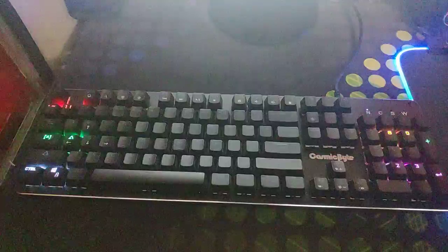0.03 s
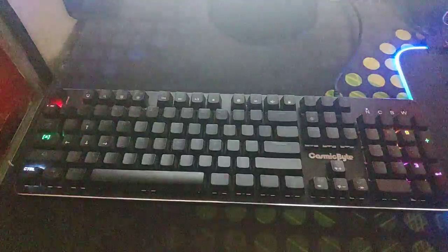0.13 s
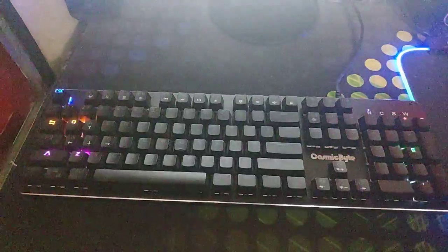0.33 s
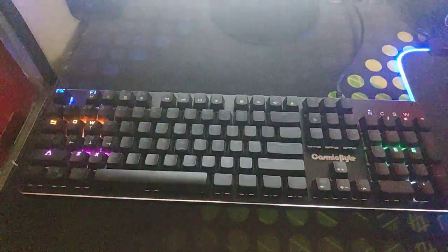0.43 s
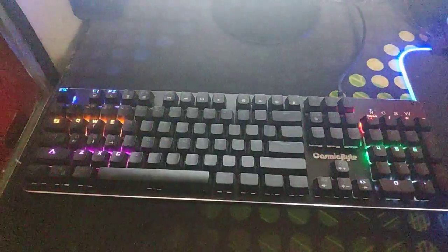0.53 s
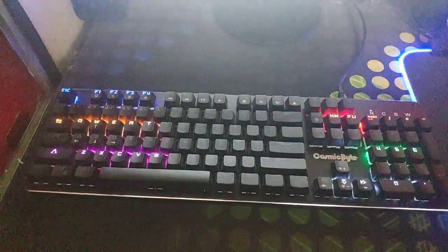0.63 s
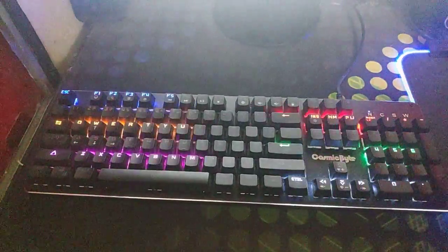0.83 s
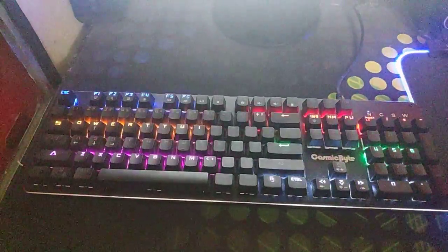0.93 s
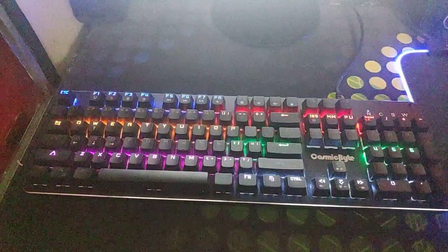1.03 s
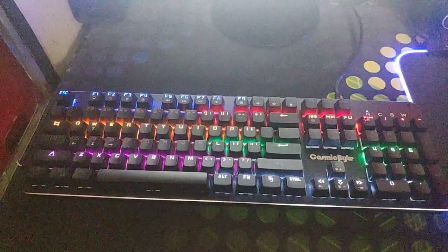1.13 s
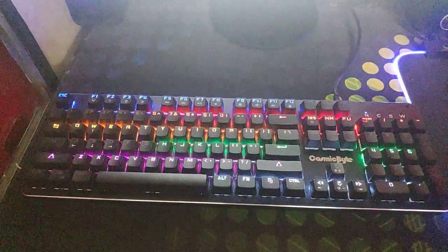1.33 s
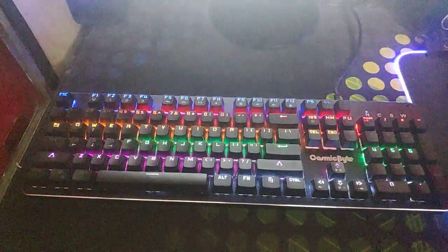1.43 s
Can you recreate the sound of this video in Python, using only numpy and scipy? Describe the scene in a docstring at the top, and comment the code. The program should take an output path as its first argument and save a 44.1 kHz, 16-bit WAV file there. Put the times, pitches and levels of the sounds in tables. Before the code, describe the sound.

A fan runs in a quiet room, fading in by 0.3 seconds: a low hum throbbing about three times a second over airy rumble and hiss. A few faint clicks fall between 0.1 and 0.3 seconds, mostly left. A thin, fast, high chirr sounds close on the right until about 0.6 seconds. One soft low bump comes at about 1.25 seconds as the fan continues.

```python
"""A quiet room with a fan running, heard from a phone held over a desk. The turning fan makes a
throbbing hum near 200 Hz, and its moving air rumbles and hisses. The microphones fade in and settle
with a few faint clicks. A thin, fast chirr, perhaps the lens focusing, sounds close to the right
microphone for about the first half second. One soft low bump comes near the end."""
import sys
import numpy as np
from scipy import signal
from scipy.fft import rfft, irfft
from scipy.io import wavfile
from scipy.ndimage import uniform_filter1d

SR = 44100
rng = np.random.default_rng(int(sys.argv[2]) if len(sys.argv) > 2 else 0)


def waveform_to_disk(signal):
    """Save audio, clipped to [-1, 1], as 16-bit WAV at the path in sys.argv[1]."""
    frames = np.transpose(np.atleast_2d(signal))
    scaled = np.clip(frames, -1, 1) * 32767
    samples = np.round(scaled).astype(np.int16)
    wavfile.write(sys.argv[1], SR, samples)


N = 66150
HUM_HZ = 197.9  # the fan's main tone


def fan_hum(t):
    """Tones that follow the fan's speed; the main one throbs about three times a second."""
    # weaker fan tones: f/Hz, level/dB, left minus right/dB
    weak_tones = [(171, -68, 1.5), (251.6, -64, -1), (277.7, -65.5, -0.5), (334.6, -72, -7.5),
                  (394, -76.5, 8), (498, -75, 7.5), (590.5, -72.5, 6.5), (706, -78, -8), (854, -77, 2.5),
                  (1588, -80, -1)]
    fan_time = t + .002 * np.cumsum(drift(5.85)) / SR  # the speed wanders a little
    peak_s, period_s = .31, .322
    throb = .2 + .8 * np.cos(np.pi * (t - peak_s) / period_s) ** 2
    main = throb * fan_tone(fan_time, HUM_HZ, db=-51.5, pan_db=-1)
    return main + sum(fan_tone(fan_time, *row) for row in weak_tones)


def fan_tone(fan_time, hz, db, pan_db):
    """One fan tone that wavers in pitch and level, placed between the microphones."""
    wander_hz = .7 * hz / HUM_HZ * drift(20)
    cycles = hz * fan_time + np.cumsum(wander_hz) / SR + rng.random()
    wave = np.sqrt(2) * np.cos(2 * np.pi * cycles) * gain(db + 1.46 * drift(18.33))
    return wave * gain([[pan_db / 2], [-pan_db / 2]])


def fan_air():
    """Moving air: both microphones hear much the same rumble, but each its own hiss."""
    # air noise: f/Hz, left level/dB, right level/dB (in a band 1 Hz wide)
    air = np.array([(25.4, -76, -88), (49.5, -78.5, -70.5), (61, -83, -85.5), (95.6, -78, -77.5),
                    (138, -82.5, -82.5), (178, -78.5, -78.5), (262, -78.5, -73), (312, -83, -87.5),
                    (376, -85, -80.5), (402, -86.5, -89), (555, -88, -92.5), (760, -90, -88.5),
                    (967, -89.5, -90), (1160, -94, -95.5), (1820, -96, -97.5), (2330, -100, -101),
                    (3450, -104, -104), (4740, -109, -106), (6500, -114, -107), (8500, -115, -109),
                    (10660, -116, -116), (14100, -115, -115)])
    # how alike the microphones sound: f/Hz, correlation (1 means the same)
    likeness = np.array([(30, 0.79), (70, 0.78), (130, 0.91), (200, 1), (300, 0.02), (630, 0.46),
                         (1300, -0.3), (3000, 0.0078)])
    log_f = np.log(np.maximum(np.fft.rfftfreq(N, 1 / SR), 1))
    alike = np.clip(np.interp(log_f, np.log(likeness[:, 0]), likeness[:, 1]), -.99, .99)
    shared = noise(np.sqrt((1 + alike) / 2))
    opposite = noise(np.sqrt((1 - alike) / 2))
    colours = [gain(np.interp(log_f, np.log(air[:, 0]), db)) for db in air[:, 1:].T]
    both = irfft(rfft([shared + opposite, shared - opposite]) * colours, N)
    flicker_db = .64 * drift(30)
    return both * np.sqrt(SR / 2) * gain(flicker_db)


def chirr(t):
    """Even, short pulses of a rough high ring, ending in one longer burst."""
    # strength of the pulses: t/s, level/dB
    strength = [(.08, -71), (0.114, -61.5), (0.133, -70), (.24, -62.5), (.345, -58.5), (.39, -58),
                (.425, -66), (.50, -58.5), (.60, -59.5), (.64, -70)]
    times, db = np.array(strength).T
    ring_hz, rough_share = 7010, .47
    pulses_per_s, one_pulse_at_s = 64.2, .454
    from_pulse_s = (((t - one_pulse_at_s) * pulses_per_s + .5) % 1 - .5) / pulses_per_s
    pulses = swell(from_pulse_s, width_s=.0023) * np.interp(t, times, gain(db), left=0, right=0)
    last_burst = gain(-58) * swell(t - .623, width_s=.0087)
    ring = np.sqrt(2) * np.sin(2 * np.pi * ring_hz * t + drift(150))
    rough = noise_band(ring_hz, width_hz=680)
    rough_ring = np.sqrt(1 - rough_share) * ring + np.sqrt(rough_share) * rough
    return np.maximum(pulses, last_burst) * rough_ring


def microphone_settling(t):
    """Each microphone's resting level (its offset) swings once, too slowly to hear."""
    # the swing, left then right: starting slope/(1/s), time to cross zero/s, decay time/s
    swings = [(2.28, 0.25, 0.13), (0.5, 0.36, 0.19)]
    age = np.maximum(t - .117, 0)
    return np.array([slope * age * (1 - age / cross) * np.exp(-age / decay)
                     for slope, cross, decay in swings])


def microphone_clicks(t):
    """Sudden steps in the microphones' offset click, mostly on the left."""
    # offset steps: t/s, size/dB
    steps = [(.1205, -54), (.1595, -36), (.2195, -34.5), (.2795, -37.5)]
    rise_s, decay_s, right_db = .000016, .018, -9
    clicks = np.zeros(N)
    for start, db in steps:
        age = np.maximum(t - start, 0)
        clicks -= gain(db) * (np.exp(-age / decay_s) - np.exp(-age / rise_s))
    return clicks * gain([[0], [right_db]])


def bump(t, at_s=1.248, hz=100):
    """A soft low bump, a few cycles long."""
    return gain(-51) * swell(t - at_s, width_s=.01) * np.sin(2 * np.pi * hz * (t - at_s))


def high_hiss():
    """Steady high hiss in two narrow bands."""
    # hiss bands: f/Hz, width/Hz, level/dB
    bands = [(5340, 300, -75.5), (6890, 990, -68)]
    return sum(gain(db) * noise_band(hz, width) for hz, width, db in bands)


def gain(db):
    """Turn decibels into a number to multiply by."""
    return 10 ** (np.asarray(db) / 20)


def swell(from_peak_s, width_s):
    """A smooth, bell-shaped rise and fall."""
    return np.exp(-.5 * (from_peak_s / width_s) ** 2)


def drift(per_s):
    """A smooth random curve of size about 1, with per_s new values a second."""
    hold = int(SR / per_s)
    stairs = np.repeat(rng.standard_normal(N // hold + 2), hold)
    smooth = uniform_filter1d(uniform_filter1d(stairs, hold), hold)
    return 1.304 * smooth[hold // 2:hold // 2 + N]


def noise(colour):
    """Noise whose strength at each frequency is set by colour."""
    return irfft(rfft(rng.standard_normal(N)) * colour, N)


def noise_band(hz, width_hz):
    """Noise of size 1, gathered around one frequency."""
    distance = (np.fft.rfftfreq(N, 1 / SR) - hz) / (.68 * width_hz)
    band = noise(1 / (1 + distance ** 2))
    return band / band.std()


def scene():
    """The fan and hiss fade in; chirr, clicks and bump lie on top."""
    # fade-in of the microphones: t/s, gain/dB
    fade_in = [(.078, -17), (.10, -7.5), (.16, -8), (.22, -4), (.29, 0)]
    times, db = np.array(fade_in).T
    t = np.arange(N) / SR
    right_only = np.array([[0], [1]])
    fade = (t >= times[0]) * gain(np.interp(t, times, db))
    room = fade * (fan_hum(t) + fan_air() + right_only * high_hiss())
    return room + right_only * chirr(t) + microphone_settling(t) + microphone_clicks(t) + bump(t)


def record(dry):
    """The phone steeply cuts the highest treble."""
    top_hz = 14200
    return signal.sosfilt(signal.ellip(10, .2, 70, top_hz, fs=SR, output="sos"), dry)


dry = scene()
out = record(dry)
waveform_to_disk(out)
```